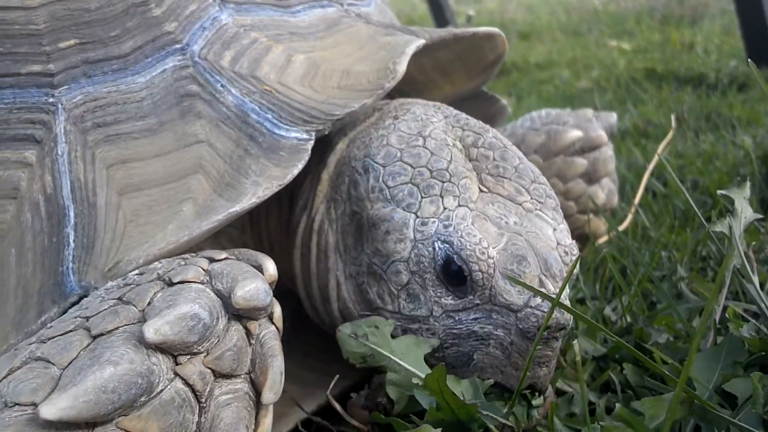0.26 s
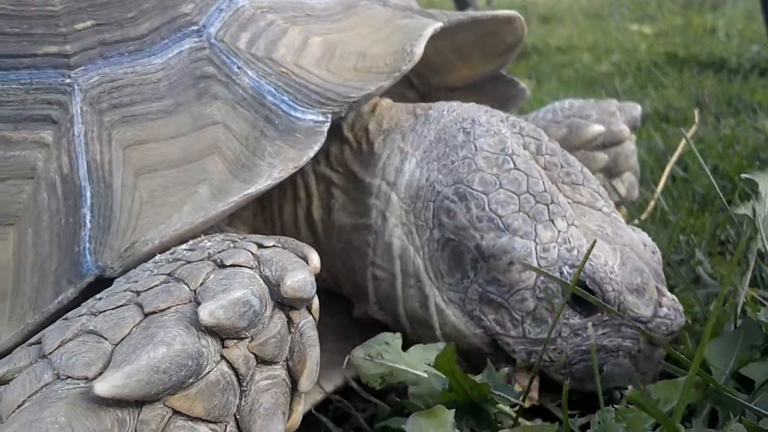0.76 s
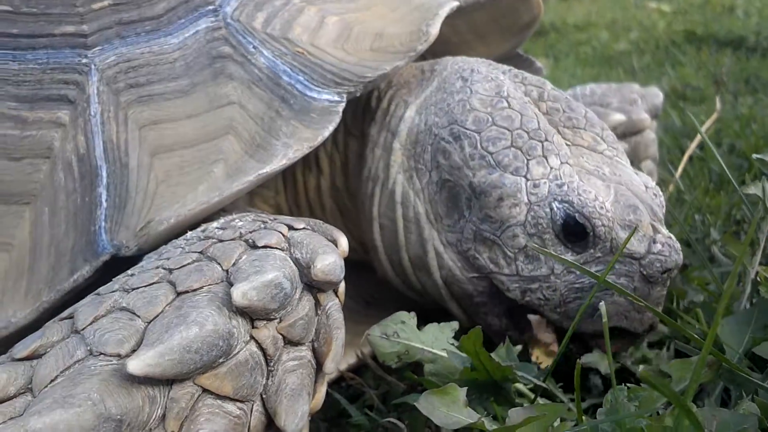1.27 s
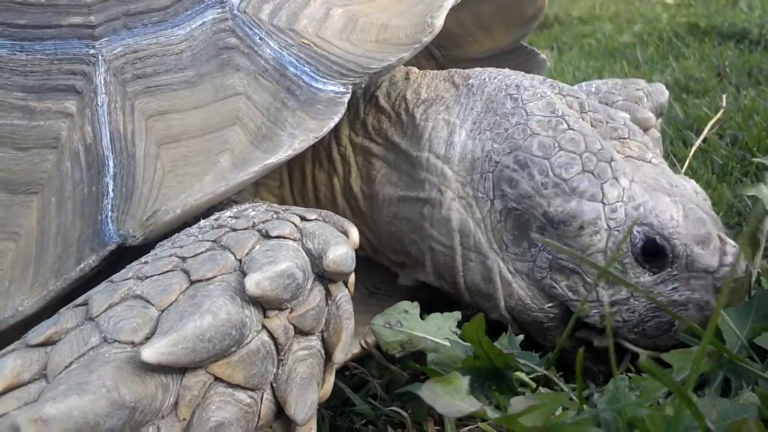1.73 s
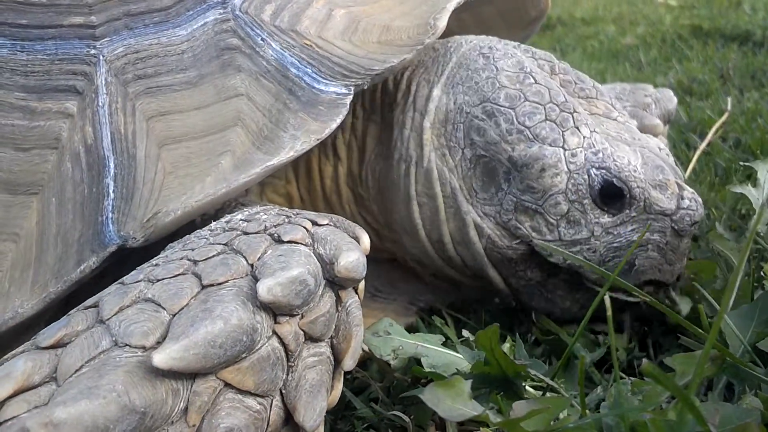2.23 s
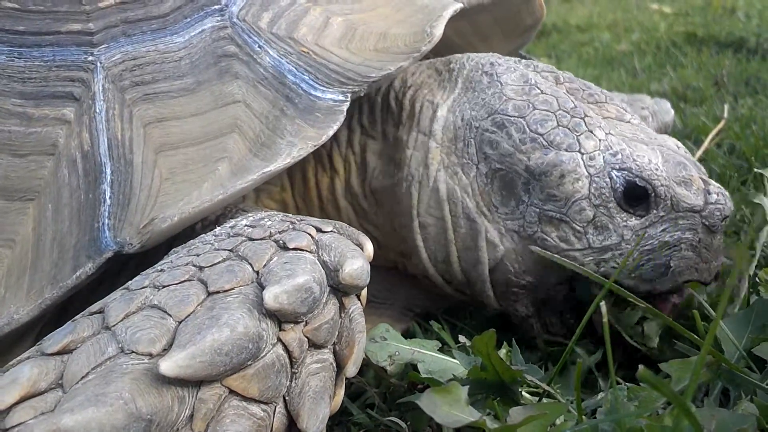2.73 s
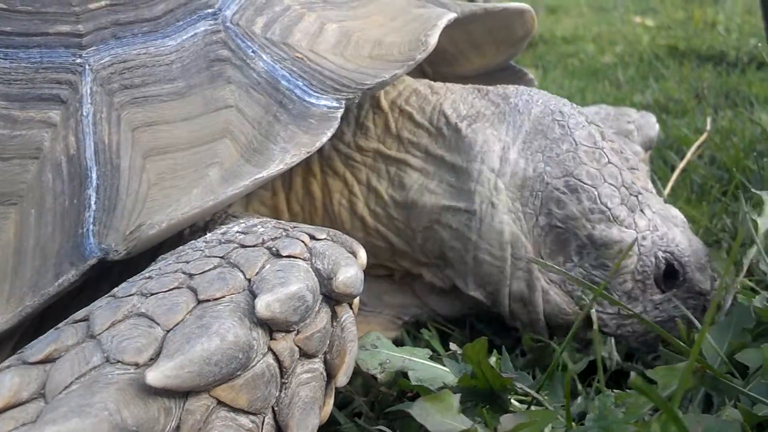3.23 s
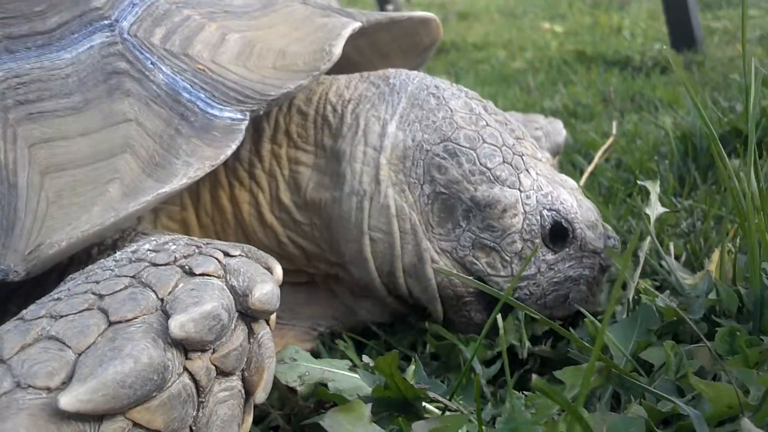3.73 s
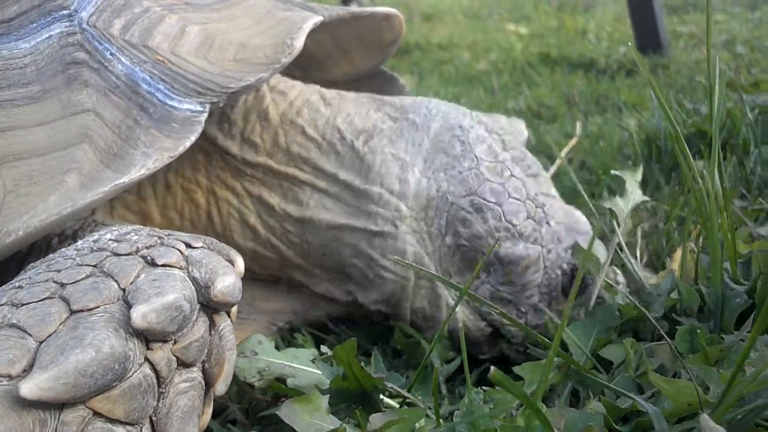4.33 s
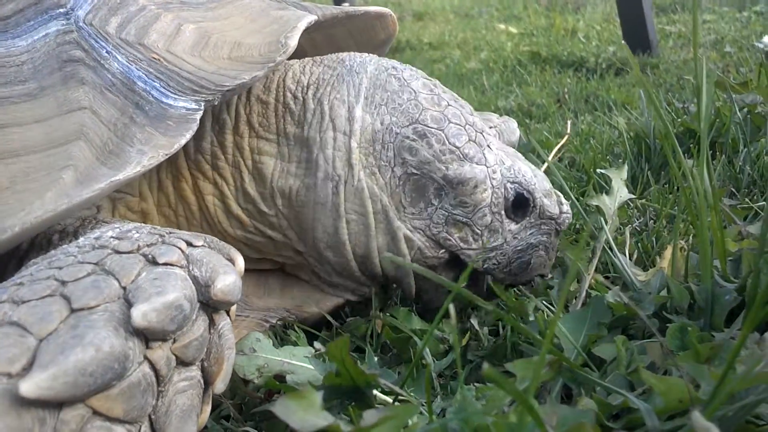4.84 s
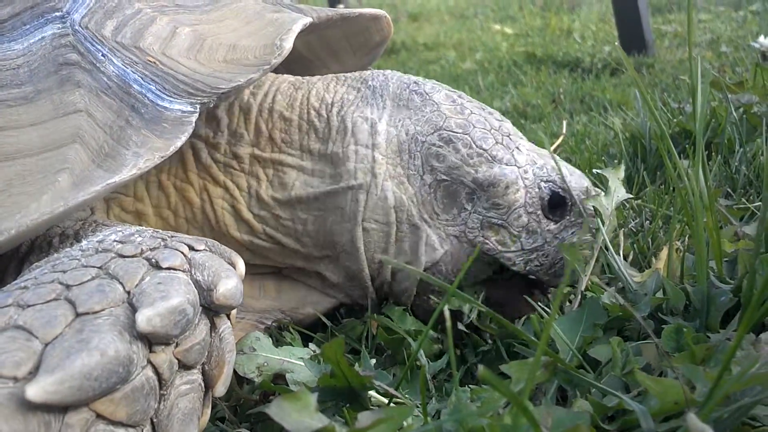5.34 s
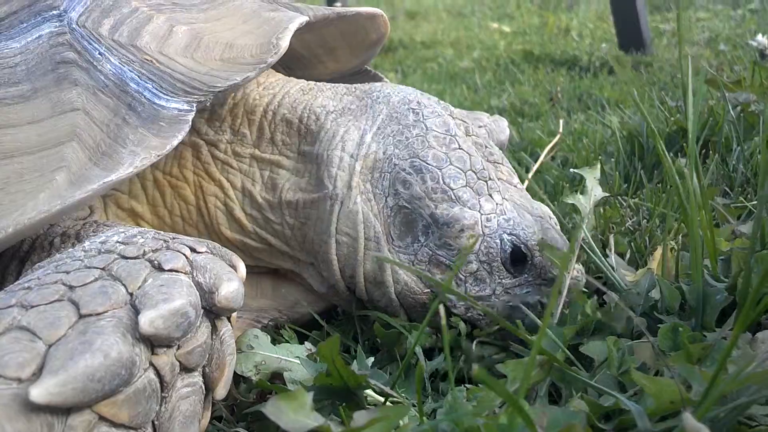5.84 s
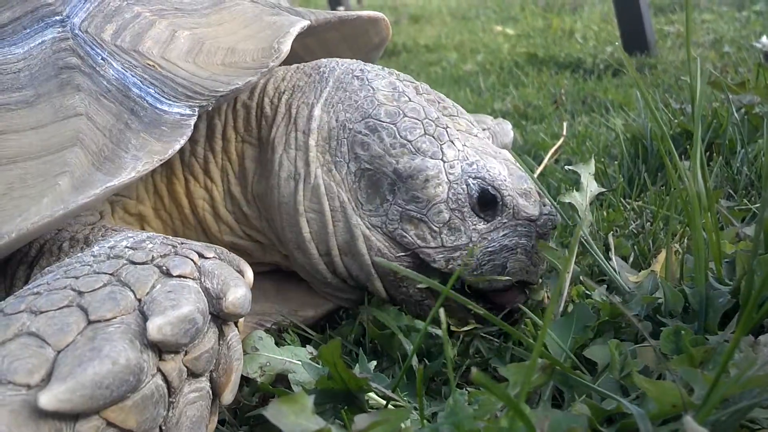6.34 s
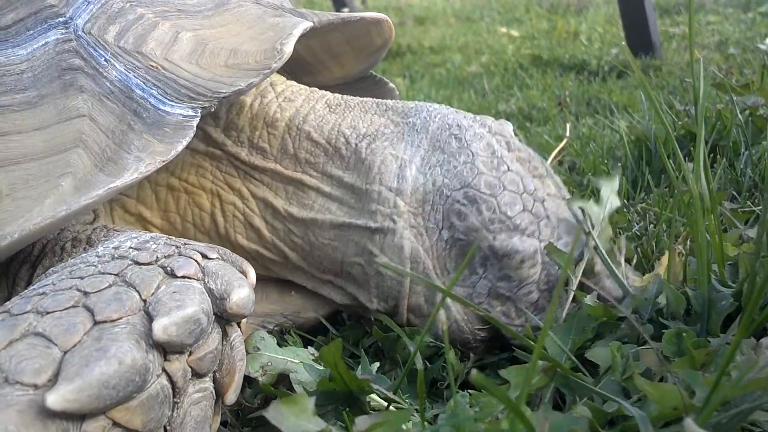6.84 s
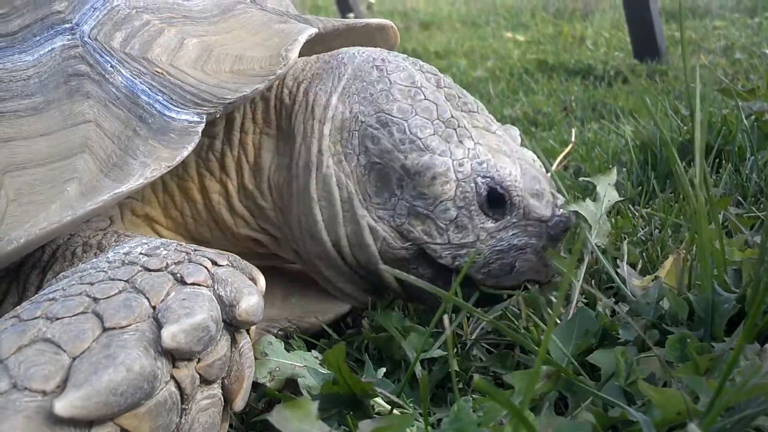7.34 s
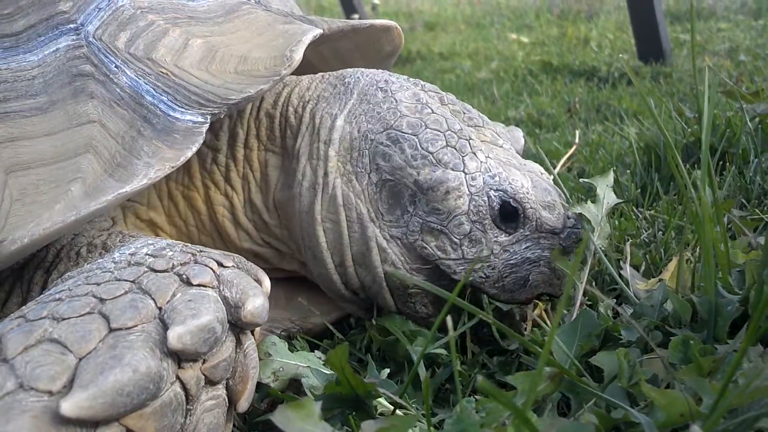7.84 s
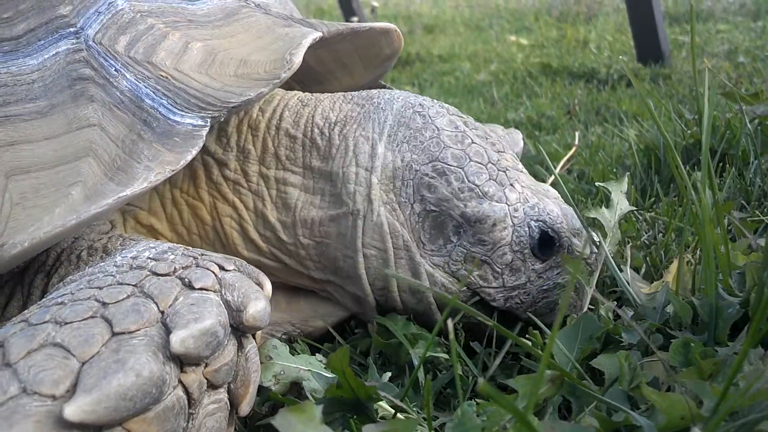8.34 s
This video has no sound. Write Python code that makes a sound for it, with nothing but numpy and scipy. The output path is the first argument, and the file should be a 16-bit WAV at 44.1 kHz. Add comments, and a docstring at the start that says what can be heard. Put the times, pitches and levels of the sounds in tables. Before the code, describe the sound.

Very close to a small stereo camera, a tortoise pushes its head through lawn weeds, rustling leaves and snapping stems in crisp uneven bursts with quieter chewing gaps. A few gardens away a dog gives short, hoarse, whimpering yelps that echo off house walls, more frequent toward the end. Soft hiss and low traffic drone lie beneath.

```python
"""Leaves rustle and crack close to a small camera as a tortoise on a lawn pushes through weeds and bites.
Stems snap as noise spikes over dull knocks; head movement drives crackling noise; a puff hisses at left.
A few gardens away a dog yelps in hoarse gliding partials and house walls answer; far traffic drones.
The camera widens its two ports by delayed cross-feed; its gain drops at loud sounds and creeps back."""
import sys
import numpy as np
from scipy import signal
from scipy.fft import rfft, irfft, next_fast_len
from scipy.io import wavfile
from scipy.ndimage import uniform_filter1d, map_coordinates

SR = 44100
rng = np.random.default_rng(int(sys.argv[2]) if len(sys.argv) > 2 else 0)


def unload_audio(sound):
    """Save the sound as a 16-bit wav file, at the path given as the first command line argument."""
    columns = np.transpose(np.atleast_2d(sound))
    # keep every value between -1 and 1, then stretch to whole-number steps
    steps = np.round(np.clip(columns, -1, 1) * 32767)
    wavfile.write(sys.argv[1], SR, steps.astype(np.int16))


N = 378963


def amp(db):
    """dB to gain."""
    return 10 ** (np.asarray(db) / 20)


def unit(x):
    """Scaled to rms 1."""
    return x / np.sqrt(np.mean(x ** 2) + 1e-20)


def along(points, hz):
    """Values of (Hz, value) points interpolated on a log frequency axis."""
    f, v = np.transpose(points)
    return np.interp(np.log(hz + 1), np.log(f + 1), v)


def curves(rows):
    """One value per sample for each column after the time."""
    s, *cols = np.transpose(rows)
    return [np.interp(np.arange(N) / SR, s, c) for c in cols]


def wobble(rate, size=N):
    """A smooth random curve, rate knots a second."""
    knots = rng.standard_normal(int(size * rate / SR) + 4)
    return map_coordinates(knots, [np.arange(size) * rate / SR])


def filtered(x, response):
    """x passed through a complex response of frequency."""
    m = next_fast_len(x.shape[-1] + 4096)
    return irfft(rfft(x, m) * response(np.fft.rfftfreq(m, 1 / SR)), m)[..., :x.shape[-1]]


def ports(pair, spectrum, side):
    """Two unrelated signals become the sum and difference of the two microphone ports."""
    def response(hz):
        return amp(along(spectrum, hz)) * [hz * 0 + 1, amp(along(side, hz))]
    total, diff = filtered(pair, response)
    return np.array([total + diff, total - diff])


def panned(db):
    """Port gains for a left-over-right level difference."""
    return amp(np.array([db / 2, -db / 2]))


# colour of the microphone noise: freq_hz, level_db
HISS_COLOUR = [(60, -16), (1000, 1), (4000, -50), (10000, 9), (14500, 14.5), (16000, 9.5)]


def microphone_hiss():
    """Steady noise of the two ports, nearly unrelated between them."""
    noise = ports(rng.standard_normal((2, N)), HISS_COLOUR, [(1000, -.3)])
    return amp(-62.0) * unit(noise)


# far traffic, before its slow drift: time_s, rumble_db, drone_db
TRAFFIC_LEVELS = [(0, -43, -45), (1, -43.5, -48.5), (2, -49.5, -48), (3, -45.5, -46.5), (4, -47, -48.5),
                  (5, -48, -47), (6, -50.5, -44.5), (7, -48, -46.5), (7.8, -47.5, -45.5), (8.1, -46, -47),
                  (8.35, -40, -46), (8.59, -48, -45.5)]
# colours of its low and middle layers: freq_hz, level_db
RUMBLE_COLOUR = [(25, -67), (45, -35), (60, -12.5), (120, 1), (220, -2.5), (400, -15), (900, -60)]
DRONE_COLOUR = [(40, -6), (120, 9.5), (300, 2.5), (630, 3), (1000, -5.5), (1600, -17), (2500, -24),
                (4000, -29.5), (8000, -40)]
# port difference over port sum for distant sound: freq_hz, level_db
FAR_SIDE_DB = [(60, -19.5), (250, -11.5), (630, -6), (1600, 7), (8000, -18)]


def traffic():
    """Distant road noise: a low rumble and a mid drone, drifting slowly."""
    rumble_db, drone_db = curves(TRAFFIC_LEVELS)
    rumble = unit(ports(rng.standard_normal((2, N)), RUMBLE_COLOUR, FAR_SIDE_DB))
    drone = unit(ports(rng.standard_normal((2, N)), DRONE_COLOUR, FAR_SIDE_DB))
    rumble_db = rumble_db + 0.28 * wobble(1.7)
    drone_db = drone_db + 0.78 * wobble(3.467)
    return amp(rumble_db) * rumble + amp(drone_db) * drone


# house walls near the dog, and walls farther off: delay_s, level_db
NEAR_WALLS = [(0.039, -12), (.09, -12)]
FAR_WALL_ECHOES = [(.17, -2), (.25, -6)]
# decay time of the gardens: freq_hz, t60_s
GARDEN_DECAY = [(300, .45), (1000, .65), (1600, .85), (4000, .5)]
# near walls return most around 2.2 kHz, less in the lows; far walls a narrow band: freq_hz, level_db
NEAR_WALL_TONE = [(450, -8.5), (1000, -5), (1450, 2), (1700, -1), (2200, 5), (3000, -4)]
FAR_WALL_TONE = [(500, -18), (1000, -17), (1250, -11), (1400, 2), (1520, 3), (1700, -8), (2200, -16)]
SMEAR_S = .03  # time spread of each echo


def gardens(x, echo_db, far_db):
    """Direct sound, smeared echoes, a tail dying by band; drawn anew per yelp so no resonance rings on."""
    hz, t, z = signal.stft(rng.standard_normal((2, SR)), SR, nperseg=256)
    decay = amp(-60 * t / along(GARDEN_DECAY, hz)[:, None])
    tail = signal.istft(z * decay, SR, nperseg=256)[1]
    tail /= np.linalg.norm(tail[0])
    lag = np.arange(tail.shape[1]) / SR

    def smeared(walls):
        shape = sum(amp(db) * np.exp(-((lag - s) / SMEAR_S) ** 2) for s, db in walls)
        return 0.05 * rng.standard_normal(tail.shape) * shape

    near = filtered(tail + smeared(NEAR_WALLS), lambda f: amp(along(NEAR_WALL_TONE, f)))
    far = filtered(smeared(FAR_WALL_ECHOES), lambda f: amp(along(FAR_WALL_TONE, f)))
    echoes = amp(echo_db) * (near + amp(far_db) * far)
    total, diff = signal.fftconvolve(x[None], echoes, axes=1)[:, :len(x)]
    total = total + amp(0.5) * x
    return np.array([total + diff, total - diff])


# yelps a few gardens away; pitch is before its shake, partial levels before the muzzle and the gardens:
# start_s, loudest_s, end_s, from_hz, top_hz, last_hz, glide_s,
# partial_1_db, partial_2_db, partial_3_db, partial_4_db, partial_6_db, flutter_depth (0-1),
# half_pitch_db and breath_db (over partial 2), echo_db, far_echo_db (over the near echoes)
DOG_YELPS = [(0.892, 0.982, 1.03, 260.4, 586.5, 554, 0.05, -38, -44.5, -58, -58.5, -79, 0.9, -8.5, -5, -0.5, -7),
             (2.344, 2.455, 2.465, 410, 538.8, 534.8, 0.03, -35, -41.5, -48.5, -61, -62.5, 0.25, -38, -8, -2.5, -8),
             (3.817, 3.84, 3.975, 421.8, 545.6, 488.6, 0.02, -40.5, -45.5, -63, -74, -74, 0.67, -18, -4, -0.5, 1.5),
             (4.673, 4.776, 4.79, 421, 620, 448.3, 0.022, -37.5, -42.5, -60.5, -77, -83, 0.29, -28, -2, -1.5, 4.5),
             (5.554, 5.605, 5.67, 405, 534.7, 511, 0.031, -29.5, -48.5, -72, -83, -88, 1, -20, 4, 0.5, 0.5),
             (6.89, 6.949, 6.995, 470.3, 526.7, 457.6, 0.03, -34.5, -36.5, -57, -77, -85, 0.76, -19, -10, -5.5, -2),
             (7.37, 7.42, 7.455, 420, 507, 486, 0.04, -40.5, -41.5, -54.5, -70, -89.5, 0.36, -31, -12, -4, -13),
             (7.624, 7.666, 7.73, 413.7, 546.5, 499, 0.036, -32.5, -41, -64, -84.5, -90, 0.22, -33, -3, -6, -9),
             (7.902, 7.933, 7.97, 404.4, 511.5, 469, 0.027, -29.5, -40.5, -55.5, -79, -88, 0.44, -26, -6, -3.5, -11),
             (8.25, 8.264, 8.325, 399.4, 509, 453, 0.025, -28, -34.5, -53, -78, -88, 0.31, -36, -13.5, -5, -10)]
# the muzzle radiates little below its first resonance: freq_hz, level_db
MUZZLE = [(330, -34), (420, -1), (480, 0.5)]
# colour of the breath noise: freq_hz, level_db
THROAT_COLOUR = [(250, -7), (550, 9), (900, 22), (1150, -18), (1480, 6.5), (1750, -10.5), (2100, -3),
                 (3000, -57)]
SHIMMER = .28  # chance wavering of each partial's strength
BRIGHTENS = .5  # partials above the third grow faster with effort, by this power each


def dog():
    """Arched, shaky partials made hoarse by a flutter of the folds, half-pitch partials and breath."""
    heard = np.zeros((2, N + 2 * SR))
    for (start, loudest, end, from_hz, top_hz, last_hz, glide, *levels,
         flutter, half_db, breath_db, echo_db, far_db) in DOG_YELPS:
        t = np.arange(start, end + .037, 1 / SR)
        rise = (top_hz - from_hz) * np.exp(-(t - start) / glide)
        bend = (last_hz - top_hz) * ((t - start) / (end - start)) ** 2
        hz = top_hz - rise + bend
        effort_s = [start, start + .015, loudest, end, end + .035]
        effort = amp(np.interp(t, effort_s, [-22, -10, -3, -7, -22]))
        push = effort / effort.max()
        levels.insert(4, (levels[3] + levels[4]) / 2)  # partial 5 lies between its neighbours
        phase = 2 * np.pi * np.cumsum(hz * (1 + .018 * wobble(90, len(t)))) / SR
        flutter_hz = 80 * (1 + 0.19 * wobble(38.0, len(t)))
        beat = np.sin(2 * np.pi * np.cumsum(flutter_hz) / SR + rng.uniform(0, 2 * np.pi))

        def shake(k):
            return 1 + flutter * min(k + .35, 1.2) * beat + SHIMMER * wobble(45, len(t))

        tone = 0
        for k, db in enumerate(levels):
            strength = np.sqrt(2) * amp(db + along(MUZZLE, (k + 1) * hz))
            strength = strength * push ** (BRIGHTENS * max(k - 2, 0))
            tone = tone + strength * shake(k) * np.sin((k + 1) * phase)
        half = sum(shake(k) * np.sin((k + .5) * phase) / (k + 1) ** .3 for k in range(1, 5))
        gated = (1 + 0.35 * np.sin(phase)) * rng.standard_normal(len(t))  # more air once a cycle
        breath = unit(filtered(gated, lambda f: amp(along(THROAT_COLOUR, f))))
        rough = amp(levels[1]) * (amp(half_db) * half + amp(breath_db) * breath)
        yelp = np.pad(effort * (tone + rough), (0, SR - len(t)))
        heard[:, round(start * SR):][:, :SR] += gardens(yelp, echo_db, far_db)
    return heard[:, :N]


# pushes and pulls of the head through the leaves: full_from_s, full_until_s, level_db
HEAD_STROKES = [(0.048, 0.086, -50.5), (0.198, 0.233, -55.5), (0.411, 0.42, -48), (0.546, 0.61, -50.5),
                (0.63, 0.65, -41), (0.705, 0.766, -48.5), (0.842, 0.913, -52), (0.992, 1.28, -57.5),
                (1.532, 1.545, -51.5), (1.693, 2.006, -47), (2.126, 2.424, -61.5), (2.71, 2.78, -57),
                (2.844, 4.595, -61), (2.988, 3.205, -48), (3.344, 3.372, -42.5), (4.22, 4.237, -53.5),
                (4.27, 4.455, -55.5), (4.49, 4.585, -46.5), (4.87, 5.026, -62), (5.288, 5.5, -63.5),
                (5.54, 5.655, -51), (5.763, 5.83, -50.5), (5.838, 6.003, -57.5), (5.905, 5.907, -42),
                (6.637, 6.846, -59), (6.842, 7.236, -52), (6.987, 7.16, -50), (7.3, 7.8, -74),
                (7.86, 8.0, -63), (8.047, 8.072, -51.5), (8.15, 8.59, -73)]
RISE_DB_PER_S, FALL_DB_PER_S = 190, 203  # a stroke swells and dies away
REST_DB = -64.5  # leaves at rest


def movement():
    """Level in dB of the head's movement among the leaves; overlapping strokes add in power."""
    t = np.arange(0, N, 64) / SR
    power = amp(2 * REST_DB)
    for start, end, db in HEAD_STROKES:
        before, after = np.maximum(start - t, 0), np.maximum(t - end, 0)
        power = power + amp(2 * (db - RISE_DB_PER_S * before - FALL_DB_PER_S * after))
    return np.interp(np.arange(N) / SR, t, 10 * np.log10(power))


# colour of close leaves, also used for the snaps: freq_hz, level_db
LEAF_COLOUR = [(500, -24), (1200, 3.5), (2500, -9), (3800, -0.5), (5500, -1), (8400, 2), (11000, -0.5),
               (13000, -4), (16000, 1.5)]
# their port difference over port sum: freq_hz, level_db
LEAF_SIDE_DB = [(500, -17), (1500, -4.5), (4000, -2.5), (16000, 3.5)]


def rustle():
    """Dense tiny crackles of uneven size ride on a soft swish; both follow the movement of the head."""
    struck = rng.random(N) < 1500 / SR  # about 1500 crackles a second
    sizes = struck * amp(np.minimum(15.0 * rng.exponential(size=N), 17))
    grains = signal.lfilter([1], [1, -.93], sizes)
    strength = (.92 + .48 * unit(grains)) * amp(2.2 * wobble(40))
    excite = strength * rng.standard_normal((2, N))
    return amp(movement()) * unit(ports(excite, LEAF_COLOUR, LEAF_SIDE_DB))


# a short smooth hiss on the left, likely air from the nostrils: time_s, level_db
PUFF_LEVEL = [(3.571, -66), (3.578, -42.5), (3.62, -41.5), (3.668, -42), (3.678, -69)]
# its colour: freq_hz, level_db
PUFF_COLOUR = [(1500, -24), (3500, -10), (5500, -7), (6800, -1), (7800, 2), (9000, -1), (10500, -10),
               (13000, -13), (16000, -12)]


def puff():
    """Smooth air noise with a sudden start and stop."""
    noise = unit(ports(rng.standard_normal((2, N)), PUFF_COLOUR, [(1000, 5.4)]))
    return amp(curves(PUFF_LEVEL)[0]) * panned(9.0)[:, None] * noise


# dull ticks low in the weeds: start_s, level_db (before the decay)
WEED_TICKS = [(3.6944, -30), (3.703, -37), (3.726, -32), (3.742, -32), (3.809, -48)]
TICK_HZ, TICK_T60_S = 1010, 0.0053  # each tick's pitch scatters around this one


def ticks():
    """Short hollow knocks, damped sines with no bright crack."""
    out, t = np.zeros(N), np.arange(900) / SR
    for s, db in WEED_TICKS:
        hz = TICK_HZ * rng.uniform(0.65, 1.43)
        envelope = amp(db - 60 * t / TICK_T60_S) * (1 - np.exp(-t / 0.0001))
        out[round(s * SR):][:len(t)] += envelope * np.sin(2 * np.pi * hz * t)
    return out


SMALL_PER_S = 170  # chance breaks of small veins
SMALL_DB, SMALL_SPREAD_DB = 5.5, 2.2  # their least level over the movement, and its scatter


def small_breaks():
    """Rows like STEM_SNAPS at chance moments, as loud as the movement makes them."""
    when, size, bright, knock, side = rng.random((int(SMALL_PER_S * N / SR), 5)).T
    s = .01 + when * (N / SR - .02)
    db = movement()[(s * SR).astype(int)] + SMALL_DB - SMALL_SPREAD_DB * np.log(1 - size)
    hz = np.where(bright < .45, 3800, 4500 + 12000 * (bright - .45))
    return list(zip(s, db, hz, -24 + 18 * knock, -8 + 10 * side))


# the clearest stems and leaf veins breaking close by, levels before the common trims below:
# time_s, level_db (crack peak), brightest_hz, knock_db (over the crack), left_over_right_db
STEM_SNAPS = [(0.065, -36, 3600, 8.5, -5), (0.2125, -39, 6400, 5, -12), (0.2345, -35.5, 3800, -25, -5),
              (0.3173, -40, 6000, 6, -12), (0.545, -38, 3600, 5, -4), (0.5776, -38, 3700, -2, -1),
              (0.703, -35, 8000, -12, 7), (0.711, -29, 7500, -8, -1), (0.774, -33, 8300, -16, 2),
              (0.8153, -31.5, 3450, 0, -4), (0.8672, -16, 8150, -14.5, -3), (0.8705, -41, 3900, -20, -3),
              (1.084, -38.5, 7000, 2, 0), (1.197, -43, 11000, -20, 0), (1.337, -26.5, 8600, -6, 1),
              (1.385, -44.5, 8000, -20, 0), (1.7775, -27.5, 3940, -14, -3), (1.7984, -27, 10100, -24, 1),
              (1.852, -23.5, 4000, -10, 9), (1.86, -27, 3920, -20, 2), (1.873, -24.5, 8400, -3, 4),
              (1.9024, -25, 8700, -12, -24), (1.93, -31, 3700, -6, 2), (1.958, -21, 3700, -10, -6),
              (1.975, -28, 3700, -19, 1), (1.997, -25, 4030, -7, -1), (2.0305, -50, 3700, -25, 1),
              (2.1315, -33, 4650, -11, -2), (3.098, -31, 8100, -6, 0), (3.13, -34.5, 4100, -21, -12),
              (3.153, -43, 3900, -19, -4), (3.1665, -21.5, 8350, -28, -2), (3.2108, -22, 4160, -18, -9),
              (3.2212, -22, 4400, -6, 16), (3.2273, -21.5, 10700, -6, 0), (3.279, -31, 3700, 4, -1),
              (3.309, -21, 5360, -6, -4), (3.3187, -19.5, 8200, -6, 6), (3.3348, -21.5, 3900, -4.5, -6),
              (3.345, -19, 4040, -12, 16), (3.359, -27, 3700, -6.5, -2), (3.365, -18.5, 6300, -4, 4),
              (3.3807, -18.5, 8600, -5, -4), (3.413, -30, 8640, -9, -5), (3.458, -36, 3500, 2, -13),
              (3.515, -47, 6000, -0.5, 11), (3.5735, -34.5, 7500, 5, -11), (3.69, -30, 7700, -15, 11),
              (3.7716, -31, 7650, 1, 6), (3.7834, -37, 7350, -6, 15.5), (3.8097, -33, 3500, -20, 2),
              (3.7967, -44, 8440, 13, 19), (3.8237, -39, 3400, 9, 16), (3.8461, -33, 3700, -13, -2),
              (3.8584, -31, 11500, -12, 1), (3.881, -38, 3350, -15, 27), (3.971, -42, 7000, -30, 4),
              (4.007, -27, 8600, -18, 5), (4.4548, -22, 3460, -6, 1), (4.481, -24, 3720, -5, -6),
              (4.496, -28.5, 3700, 7, -8), (4.5023, -21.5, 3570, -1, -2), (4.5094, -16.5, 4540, -3.5, 12),
              (4.523, -29, 3700, -4, -10), (4.533, -19.5, 8700, -5, -8), (4.537, -23, 3800, -4, 3),
              (4.564, -29, 3700, -16, 6), (4.6, -24.5, 3760, -12, 10), (4.653, -26, 3600, -1, 3),
              (4.658, -25.5, 3740, 1, 7), (4.854, -45, 3800, 9, 7), (5.2113, -36.5, 9100, -22, 12),
              (5.739, -28.5, 8360, -3, 4), (5.7593, -31, 3800, 2.5, 20), (5.774, -36, 3340, 3, 0),
              (5.819, -26, 4230, -5.5, -1), (5.8285, -24, 8600, -10, -1), (5.8438, -20.5, 3750, 3.5, 1),
              (5.85, -16.5, 7100, -9, -4), (5.874, -26, 4020, 1, 0), (5.897, -19, 10650, -5.5, -3),
              (5.9, -21, 11200, -8.5, -8), (5.911, -23, 10930, -3, -6), (5.9354, -22, 7700, -13, 3),
              (5.961, -44, 7000, -16, -7), (6.009, -31.5, 4240, -0.5, -1), (6.297, -57, 3800, 6, 5),
              (6.393, -52, 8050, -20, 2), (6.921, -27.5, 8280, -25, 1), (6.97, -29.5, 3950, -4, -6),
              (6.9972, -26, 3630, -11, -2), (7.025, -24.5, 8950, -1.5, -3), (7.0372, -25.5, 3600, -25, -4),
              (7.0432, -22, 6000, -13, 6), (7.0594, -24, 3450, -5, 0), (7.0838, -24, 3900, -6, 3),
              (7.098, -19, 3720, 0, -4.5), (7.106, -22.5, 3920, 9, 1), (7.1122, -21, 7760, -9, -9),
              (7.1306, -29, 3820, -5, 1), (7.153, -32, 3700, -6, 1), (7.1842, -10.5, 4960, -7.5, 0),
              (7.2264, -14.5, 4300, -7.5, 12), (7.381, -39.5, 6000, -17.5, 2), (7.748, -42, 4240, -14.5, 0),
              (7.8103, -39, 10700, -21, -24), (7.88, -37, 9000, -28, 0)]
# colour of the low knock: freq_hz, level_db
KNOCK_COLOUR = [(250, 10), (500, 8), (1000, -1), (1600, 1.5), (2200, 3.5), (3500, -24.5)]


def snaps():
    """Each break is a spike and a few ms of splintering, bright around its own pitch, over a duller knock."""
    out, t = np.zeros((2, N + SR)), np.arange(1400) / SR - .002

    def fade(t60):
        # a noise swell of a few ms leads into each spike
        return amp(np.where(t < 0, 60 * t / 0.0034, -60 * t / t60))

    for s, db, hz, knock_db, pan in STEM_SNAPS + small_breaks():
        burst = rng.standard_normal((3, len(t))) * (fade(.007) + .17 * fade(.055))
        burst[:, np.argmin(abs(t))] = [7, 4, 6]  # the spike
        burst[:, rng.integers(100, 400, size=4)] += rng.normal(0, .7, size=4)  # smaller fibres follow

        def brightness(f):
            peak = np.exp(-(np.log((f + 1) / hz) / .25) ** 2)
            return np.minimum(f / hz, 1) ** .9 + 2.2 * peak

        crack = ports(filtered(burst[:2], brightness), LEAF_COLOUR, LEAF_SIDE_DB)
        crack = crack / np.abs(crack.mean(0)).max()
        knock = filtered(burst[2], lambda f: amp(along(KNOCK_COLOUR, f)))
        knock = amp(knock_db - 7.5) * knock / np.abs(knock).max()
        placed = amp(db + 1.0) * panned(pan)[:, None] * (crack + knock)
        out[:, round((s + t[0]) * SR):][:, :len(t)] += placed
    return out[:, :N]


def scene():
    """Everything as it reaches the two ports, with their own hiss."""
    background = microphone_hiss() + traffic() + dog()
    return background + rustle() + puff() + ticks() + snaps()


# left port over right port: freq_hz, level_db
PORT_BALANCE = [(40, -5), (300, 3), (1000, 3.5), (3000, -14.5), (15000, 2)]
# cross-feed between the ports: freq_hz, share (0-1, subtracted from the other side)
CROSSFEED_SHARE = [(100, .9), (2500, .96), (5000, .92), (6300, .6), (7500, .5), (9000, .3), (16000, .15)]
CROSS_S = 0.0004067  # delay of the cross-feed
# treble roll-off of the camera: freq_hz, level_db
TREBLE_EDGE = [(15700, 1), (15900, -36), (16500, -34)]
TOP_HZ = 16700  # nothing passes from here up


def record(dry):
    """Cross-feed widening, gain control that drops at once and creeps back, band limit."""
    def across(hz):
        return np.clip(along(CROSSFEED_SHARE, hz), 0, 1) * np.exp(-2j * np.pi * hz * CROSS_S)

    uneven = filtered(dry, lambda hz: panned(along(PORT_BALANCE, hz)))
    wide = uneven - filtered(uneven[::-1], across)
    power = uniform_filter1d((wide ** 2).max(0), 130)  # louder port, over about 3 ms
    loud_db = 10 * np.log10(np.abs(power) + 1e-12)
    need_db = np.minimum(0, 1.094 * (-26.0 - loud_db))
    climb_db = 7.3 * np.arange(N) / SR  # recovery in dB a second
    gain_db = np.minimum(0, np.minimum.accumulate(need_db - climb_db) + climb_db)
    gain = signal.lfilter([.004], [1, -(1 - .004)], amp(gain_db) - 1) + 1  # rounds the drops
    return filtered(wide * gain, lambda hz: amp(along(TREBLE_EDGE, hz)) * (hz < TOP_HZ))


dry = scene()
out = record(dry)
unload_audio(out)
```